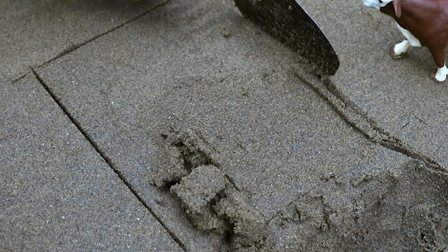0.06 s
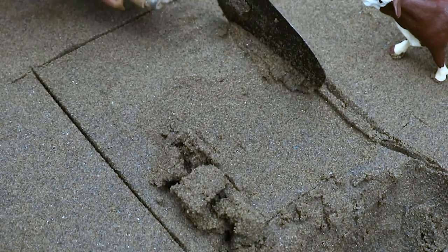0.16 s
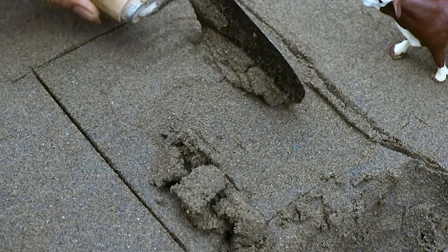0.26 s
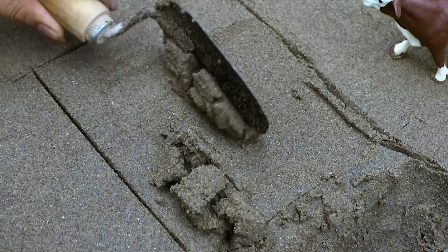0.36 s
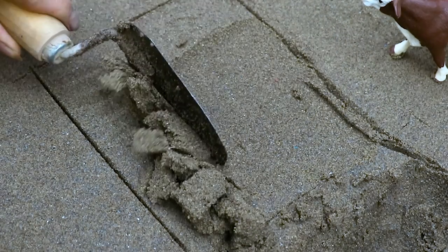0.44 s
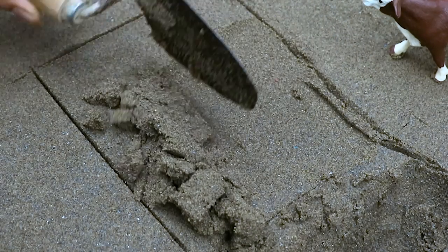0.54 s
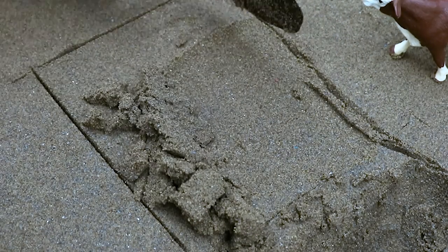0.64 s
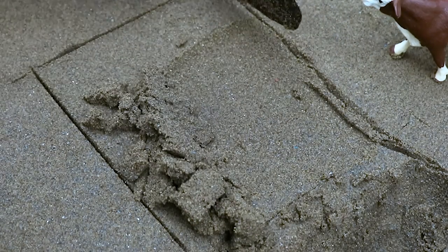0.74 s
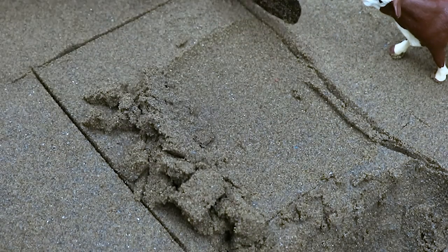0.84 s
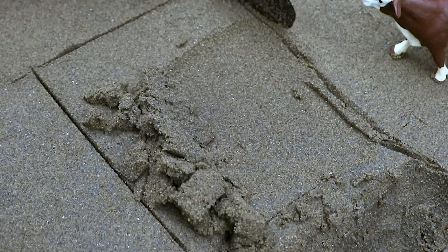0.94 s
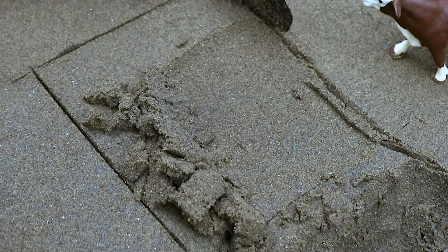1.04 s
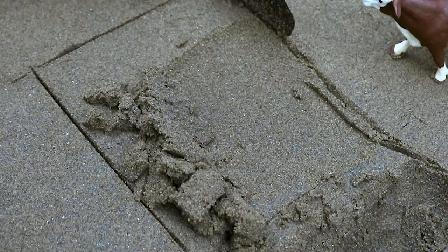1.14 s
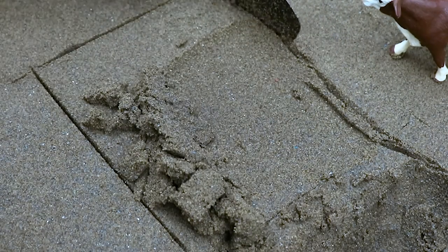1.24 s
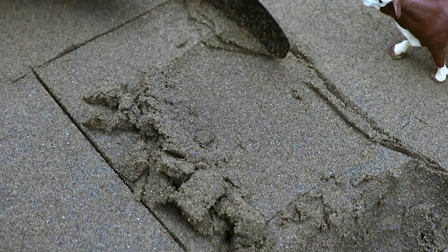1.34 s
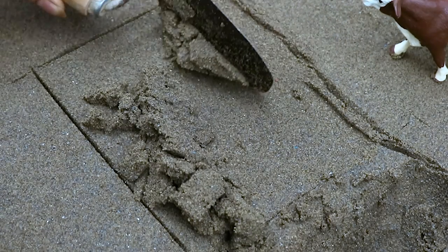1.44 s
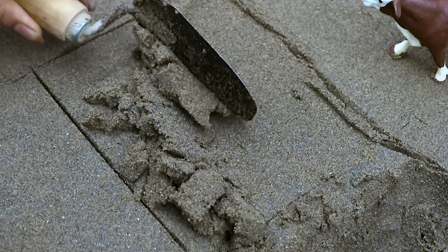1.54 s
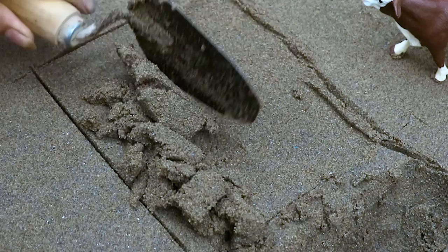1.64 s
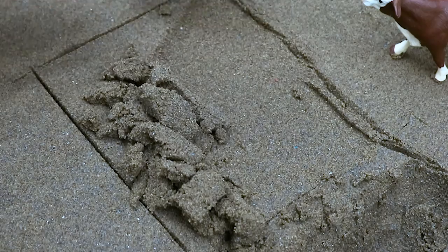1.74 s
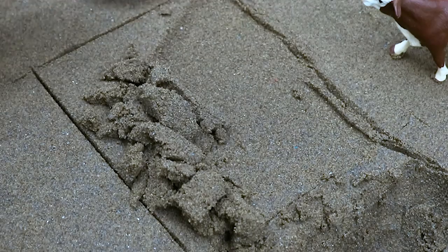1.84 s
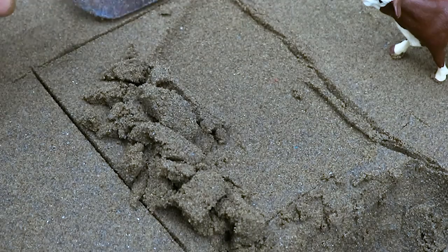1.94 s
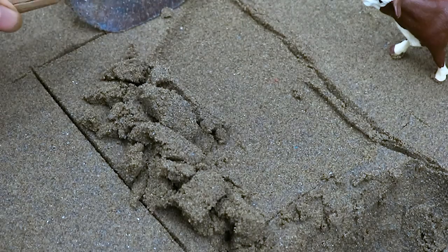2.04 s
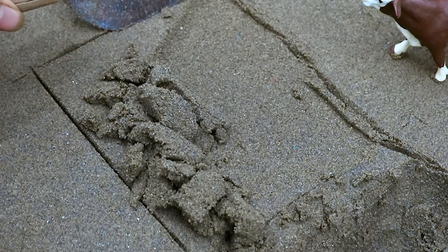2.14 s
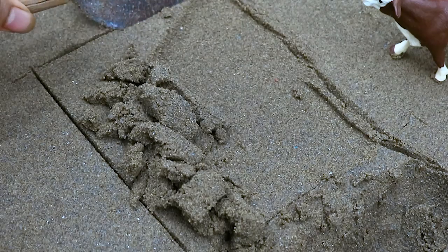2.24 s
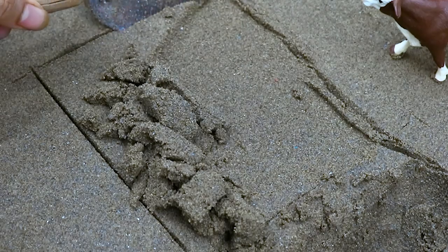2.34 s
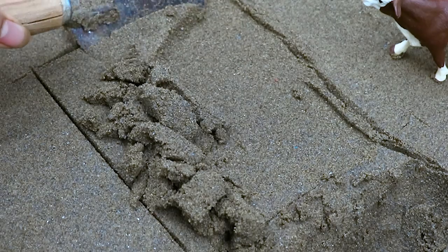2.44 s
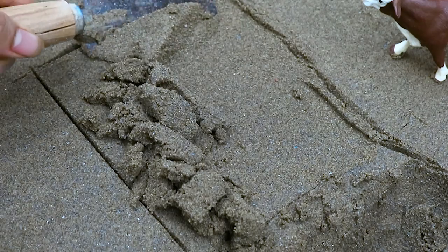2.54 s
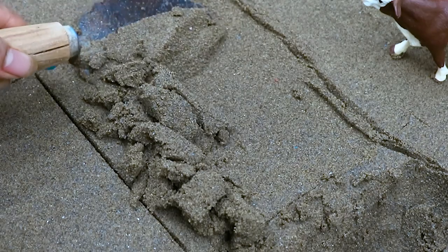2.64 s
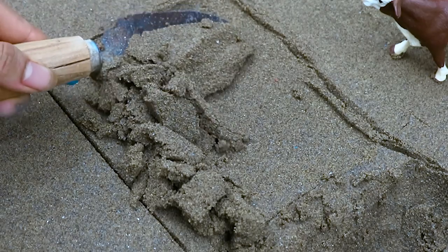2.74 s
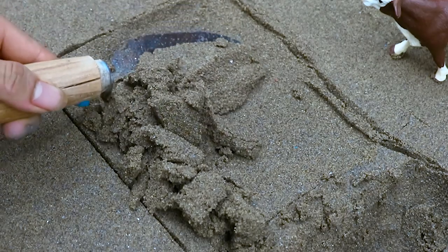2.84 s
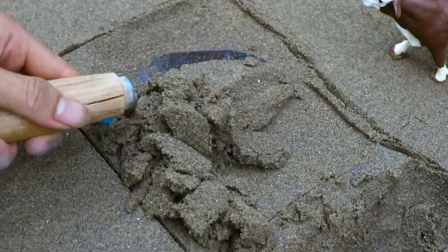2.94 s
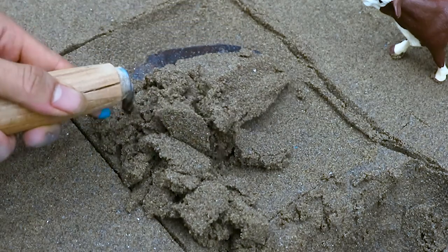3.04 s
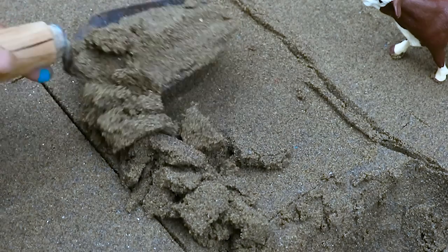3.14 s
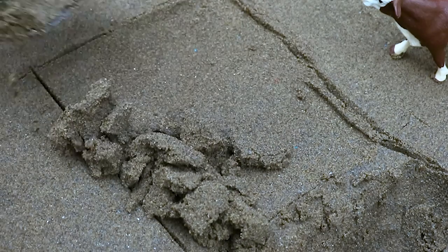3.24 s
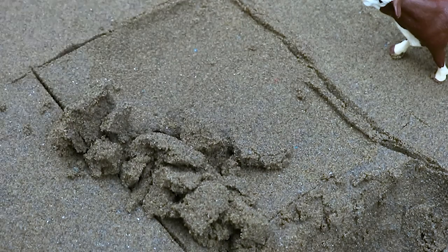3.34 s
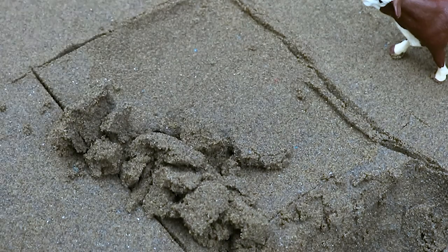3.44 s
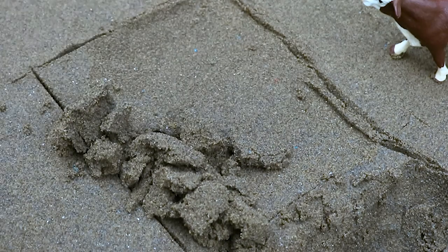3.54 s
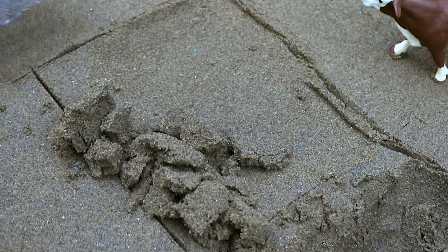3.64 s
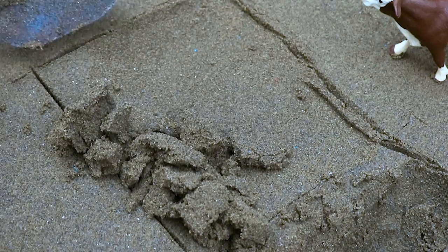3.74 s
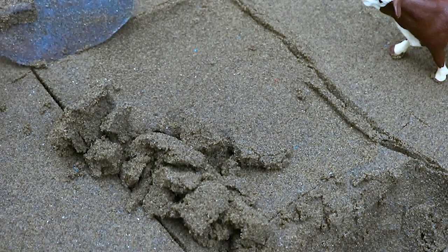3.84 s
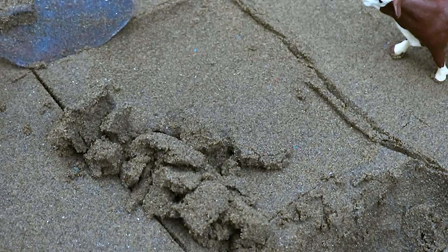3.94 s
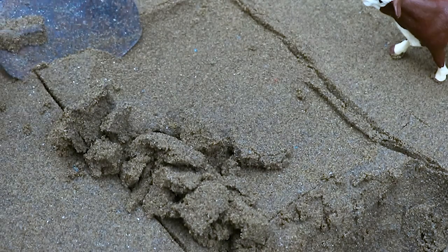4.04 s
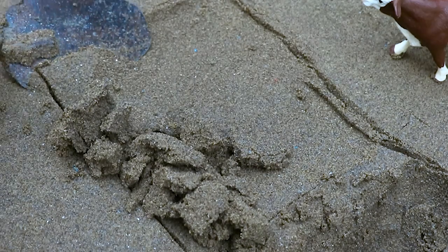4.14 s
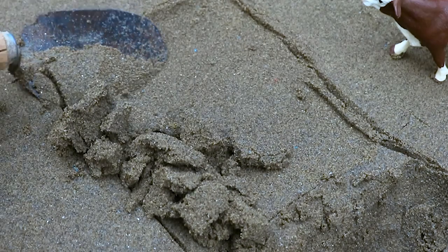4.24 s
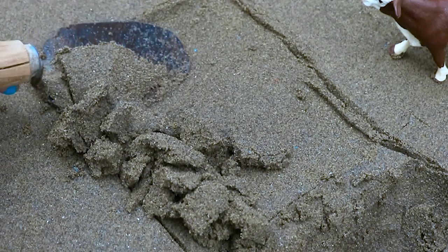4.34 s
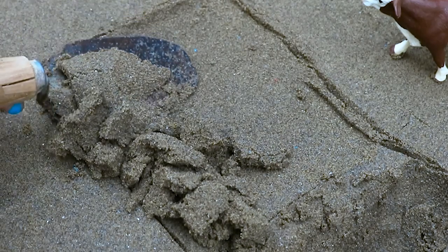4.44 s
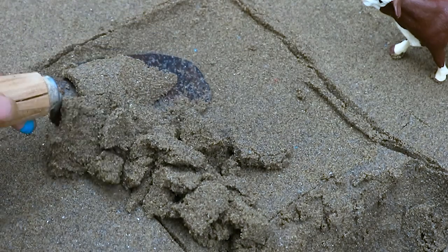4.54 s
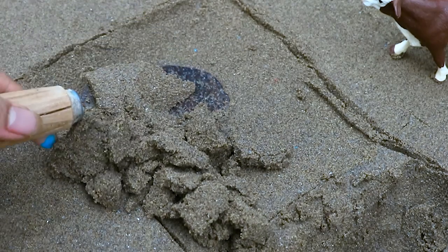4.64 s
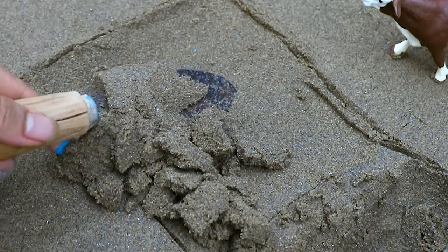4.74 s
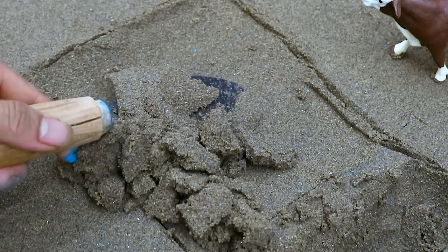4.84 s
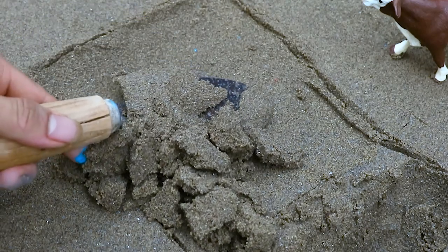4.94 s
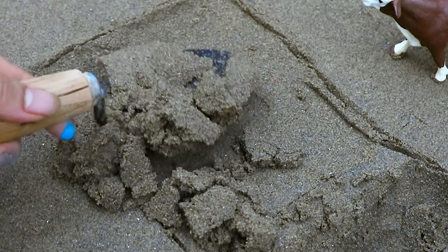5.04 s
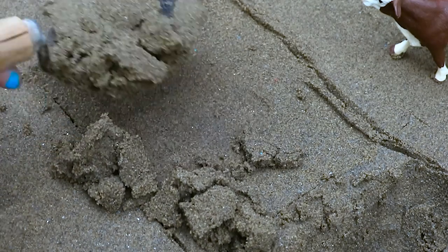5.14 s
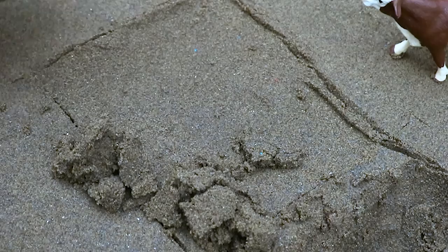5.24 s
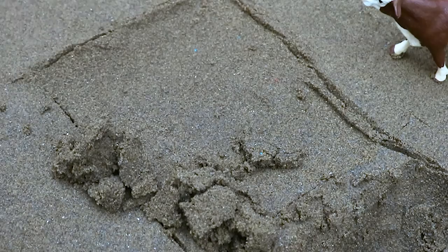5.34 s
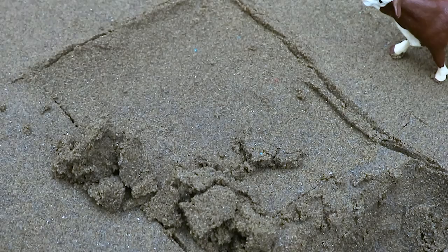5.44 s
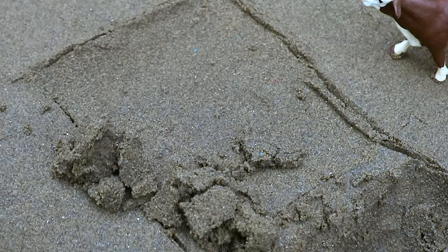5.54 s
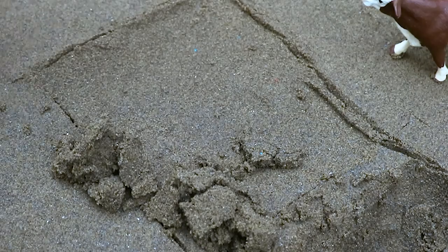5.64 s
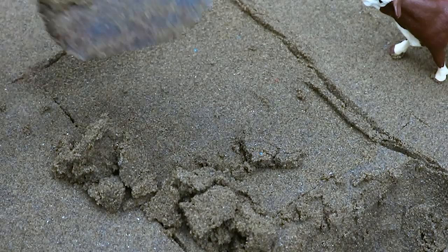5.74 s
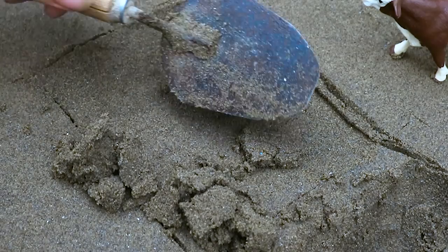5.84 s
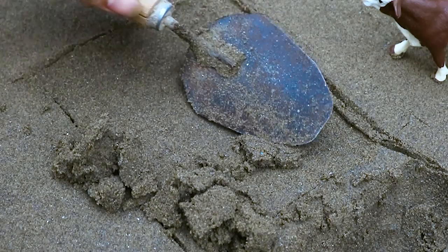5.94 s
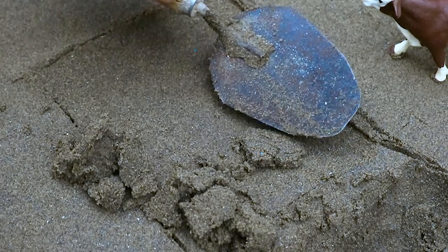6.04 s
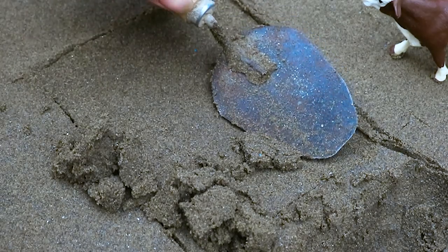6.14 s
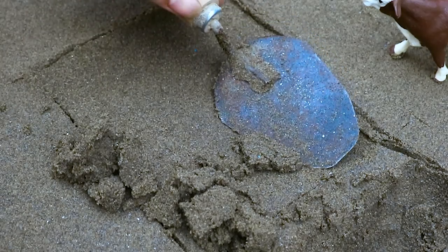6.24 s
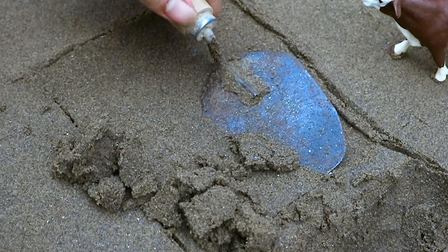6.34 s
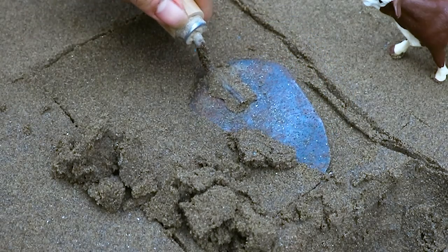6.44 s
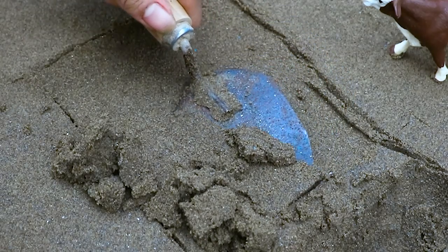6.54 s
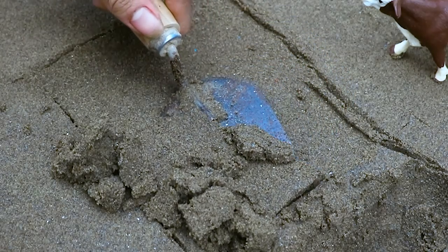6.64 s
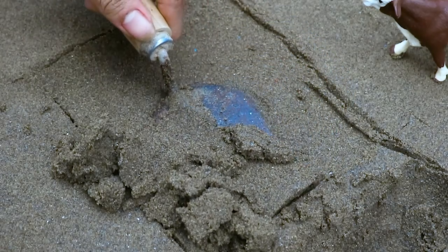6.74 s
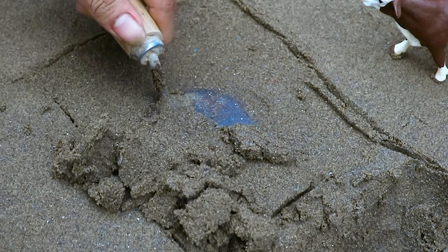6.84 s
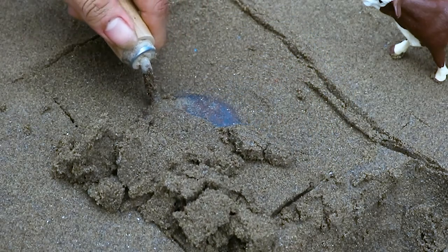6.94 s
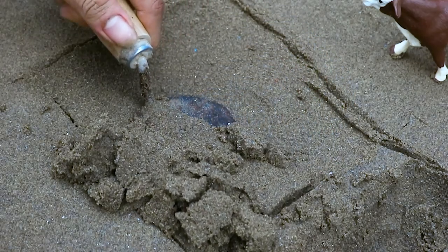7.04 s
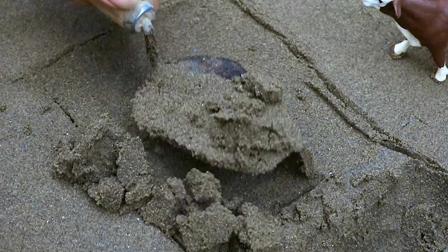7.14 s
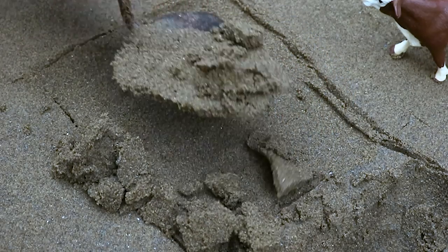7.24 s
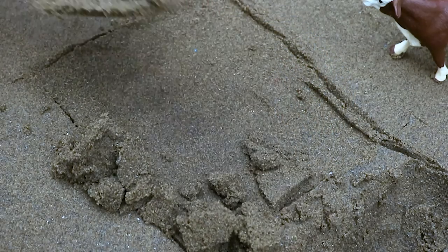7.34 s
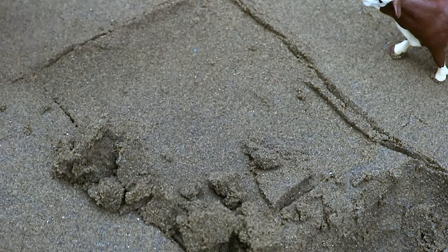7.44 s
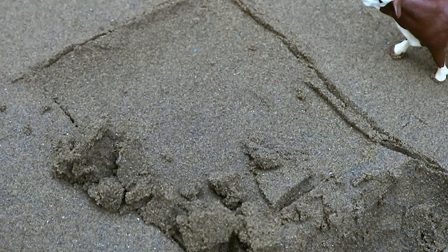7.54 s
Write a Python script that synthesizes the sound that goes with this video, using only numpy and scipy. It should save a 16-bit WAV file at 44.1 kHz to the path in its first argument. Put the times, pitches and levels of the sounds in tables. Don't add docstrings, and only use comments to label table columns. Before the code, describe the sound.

Crisp, grainy scrapes of a metal blade in wet sand come and go close by, with high birdsong echoing among trees.

```python
import sys
import numpy as np
from scipy import signal
from scipy.fft import rfft, irfft, next_fast_len
from scipy.io import wavfile
from scipy.ndimage import uniform_filter1d, map_coordinates

SR = 44100
rng = np.random.default_rng(int(sys.argv[2]) if len(sys.argv) > 2 else 0)


def materialize(psi):
    bounded = np.clip(np.atleast_2d(psi).T, -1, 1)
    quanta = np.round(bounded * 32767).astype(np.int16)
    wavfile.write(sys.argv[1], SR, quanta)


def voltage_ratio(decibels):
    exponent = np.asarray(decibels, float) / 20
    return 10 ** exponent


N = 334278


def white(*shape):
    return rng.standard_normal(shape)


def level(x, db):
    return x * voltage_ratio(db) / np.sqrt(np.mean(x ** 2))


def gain_of(points, hz):
    at_hz, db = np.transpose(points)
    return voltage_ratio(np.interp(np.log(hz + 1), np.log(at_hz), db))


def colour(x, shape):
    size = next_fast_len(x.shape[-1], True)
    hz = np.arange(size // 2 + 1) * SR / size
    return irfft(rfft(x, size) * shape(hz), size)[..., :x.shape[-1]]


def below(hz, edge_hz, order=3):
    return 1 / (1 + (hz / edge_hz) ** (2 * order))


def walk(rate, size):
    hold = int(SR / rate)
    steps = np.repeat(white(size // hold + 1), hold)
    return 1.144 * uniform_filter1d(steps, hold)[:size]


def add(out, x, start_s):
    i = int(start_s * SR)
    out[..., i:i + x.shape[-1]] += x[..., :N - i]


# pitch_hz, density_db (per Hz)
LEAF_HISS = [(25, -28), (90, -35), (160, -16.5), (290, -1), (600, -5), (1000, -10.5), (1900, -12.5),
             (3300, -8), (4500, -12.5), (6000, -17), (9000, -19.5), (12300, -22.5), (13600, -29),
             (14600, -50)]


def wood():
    hiss = colour(white(N), lambda hz: gain_of(LEAF_HISS, hz))
    return level(hiss, -58.5 + 0.39 * walk(0.96, N))


def trees(x, wet_db, t60, near_db, dull_hz):
    t = np.arange(SR) / SR
    trunks = voltage_ratio(0.57 * walk(51.5, len(t)) - 60 * t / t60)
    leaves = voltage_ratio(near_db - 60 * t / 0.05)
    echo = white(len(t)) * (trunks + leaves) * np.clip(t / 0.0038, 0, 1)
    echo = colour(echo, lambda hz: np.sqrt(below(hz, dull_hz)))
    echo = echo * voltage_ratio(wet_db) / np.sqrt(np.sum(echo ** 2))
    return x + signal.fftconvolve(x, echo)[:N]


def note(length_s, start_hz, mid_hz, end_hz, db, round_off=0.49, lean=0.66, wobble=None):
    u = np.linspace(0, 1, int(length_s * 1.15 * SR))
    hz = 2 * start_hz * (u - .5) * (u - 1) - 4 * mid_hz * u * (u - 1) + 2 * end_hz * u * (u - .5)
    if wobble is not None:
        hz = hz * (1 + wobble[:len(hz)])
    shape = np.abs(np.sin(np.pi * u ** lean)) ** round_off
    return voltage_ratio(db + 5) * shape * np.sin(2 * np.pi * np.cumsum(hz) / SR)


def triller():
    syllables, first_s, gap_s, slowing_s = 21, .029, .059, .0004
    peak_s, swell_db_per_s, fade_db_per_s = 0.83, 6, 13.5
    out = np.zeros(N)
    for k, chance in enumerate(white(syllables, 4)):
        s = first_s + gap_s * k + slowing_s * k ** 2
        db = -33 - max(swell_db_per_s * (peak_s - s), fade_db_per_s * (s - peak_s))
        top_hz = (7030 - 360 * s) * (1 + .012 * chance[0])
        sweep_hz = 9610 * (1 + 0.0263 * chance[1])
        hook_db = db + 2.5 + 0.58 * chance[2]
        sweep_db = db - 6 + 4.0 + 0.71 * chance[3]
        hook = note(.018, 0.62 * top_hz, .925 * top_hz, top_hz, hook_db, round_off=1.8, lean=1.45)
        sweep = note(0.015, sweep_hz, 0.84 * sweep_hz, 0.638 * sweep_hz, sweep_db, round_off=0.54, lean=2.25)
        add(out, hook, s - .003)
        add(out, sweep, s + .026 - .001)
    heard = trees(out, -3.5, 0.62, 3.8, 10000)
    breath = colour(white(int(1.5 * SR)),
                    lambda hz: np.sqrt(below(hz, 10300, order=8) - below(hz, 3800, order=8)))
    add(heard, level(breath, -57.5) * np.hanning(len(breath)) ** 0.25, 0)
    return heard


def glides(rows, bend):
    return [(s, length_s, a, a + bend * (b - a), b, db) for s, length_s, a, b, db in rows]


# start_s, length_s, pitch_hz, level_db
LEVEL_WHISTLES = [(.003, 0.022, 8000, -54), (0.474, 0.074, 2305, -63.5), (1.172, .036, 3450, -53),
                  (1.49, .06, 2280, -59), (3.19, 0.051, 3370, -56), (3.353, 0.043, 2340, -44),
                  (3.714, .02, 1940, -61), (4.07, .12, 2296, -53), (4.722, 0.012, 2910, -44),
                  (5.395, 0.039, 4750, -64), (5.712, 0.071, 2397, -48), (5.804, 0.056, 4750, -61.5)]
# start_s, length_s, top_hz, level_db
HANGING_DROPS = [
    (4.559, .03, 3396, -43),
    (5.022, .02, 2498, -46.5),
    (5.048, .016, 2710, -44.8),
    (5.788, .015, 2750, -41.5),
    (5.814, .02, 2795, -43),
]
# start_s, length_s, start_hz, end_hz, level_db
STEEP_PLUNGES = [
    (3.614, .056, 3255, 1600, -42),
]
# start_s, length_s, start_hz, end_hz, level_db
EVEN_RISES = [
    (3.756, 0.02, 4300, 4800, -56),
    (3.775, .014, 2900, 5450, -47),
    (3.838, 0.019, 2270, 2730, -45),
    (4.028, 0.016, 3000, 3700, -54),
    (4.043, .012, 3700, 5400, -43),
    (5.15, .013, 3880, 4500, -51),
    (5.315, 0.0747, 3254, 3476, -35.5),
    (6.858, .03, 4100, 4280, -67),
    (7.297, .016, 3900, 4600, -66),
    (7.5, 0.03, 2690, 3820, -63),
]
# start_s, length_s, start_hz, end_hz, level_db
EVEN_FALLS = [(.03, 0.016, 4480, 3750, -56.5), (.678, 0.027, 4400, 3050, -53), (.896, .02, 4336, 3270, -52),
              (2.76, .075, 5430, 5198, -51), (3.171, 0.011, 3560, 2550, -52),
              (3.29, 0.058, 2000, 1747, -52), (3.451, 0.069, 7100, 5700, -61.5),
              (3.853, .028, 2714, 1890, -50), (4.186, .032, 3640, 2250, -42.5),
              (5.163, .024, 4470, 3250, -43), (5.46, .028, 2490, 1655, -48.5),
              (5.646, 0.022, 6100, 4000, -46.5), (6.935, 0.098, 3580, 2930, -60),
              (7.12, 0.1, 3500, 2850, -60.5), (7.33, 0.075, 3130, 3040, -66.5)]
# start_s, length_s, start_hz, end_hz, level_db
SETTLING_GLIDES = [
    (3.192, 0.019, 2600, 3364, -44),
    (3.455, .059, 9900, 8500, -60.5),
    (4.066, 0.0266, 4180, 3890, -39),
    (4.494, 0.02, 4990, 4340, -44.5),
    (4.917, 0.091, 1982, 2187, -48),
    (5.074, .024, 2774, 2686, -45.5),
    (5.238, .085, 3380, 3222, -42.5),
    (5.518, 0.0288, 3500, 2944, -39),
    (5.845, 0.0295, 2883, 2722, -40),
]
# start_s, level_db
FAR_TURNS = [
    (.522, -52.5),
    (.734, -51),
    (.951, -49),
]


def song():
    half_s, foot_hz, top_hz = .027, 2600, 3540
    ups = [(s, half_s, foot_hz, top_hz, db - 4) for s, db in FAR_TURNS]
    downs = [(s + half_s, 1.15 * half_s, top_hz, foot_hz, db) for s, db in FAR_TURNS]
    notes = [(s, length_s, 0.97 * hz, hz, hz, db) for s, length_s, hz, db in LEVEL_WHISTLES]
    notes += [(s, length_s, hz, 0.97 * hz, 0.805 * hz, db) for s, length_s, hz, db in HANGING_DROPS]
    notes += glides(STEEP_PLUNGES, 0.39) + glides(EVEN_RISES, 0.6) + glides(EVEN_FALLS, .62)
    notes += glides(SETTLING_GLIDES, 1.05)
    return notes + glides(ups, 0.738) + glides(downs, 0.416)


# start_s, length_s, start_hz, end_hz, level_db
ROUGH_GLIDES = [
    (1.88, .176, 5260, 2620, -53),
    (3.455, 0.14, 2600, 2505, -45),
    (2.92, .06, 2200, 2400, -52),
    (1.662, .085, 2850, 3650, -50.5),
    (4.335, .055, 2700, 3600, -45.5),
    (4.735, .05, 3200, 3850, -44.5),
]


def whistlers():
    far_until_s, facing_s, warble_hz = 2.2, 6.8, 76
    far, near = np.zeros((2, N))
    for s, length_s, *pitch_db in song():
        if s < far_until_s:
            add(far, note(length_s, *pitch_db, round_off=0.13, lean=0.61), s - 0.035 * length_s)
        else:
            add(near, note(length_s, *pitch_db) * voltage_ratio(3.5 * (s > facing_s)), s - 0.036 * length_s)
    warble = np.sin(2 * np.pi * warble_hz * np.arange(SR // 2) / SR)
    jitter_hz = (500, 260, 300, 300, 300, 300)
    jitter_depth = (.07, 0.0205, .05, .015, .03, .02)
    for row, rate, depth in zip(glides(ROUGH_GLIDES, 0.69), jitter_hz, jitter_depth):
        s, length_s, *pitch_db = row
        jitter = uniform_filter1d(white(SR // 2), int(SR / rate)) * np.sqrt(SR / rate)
        buzz = note(length_s, *pitch_db, wobble=depth * jitter + 0.049 * warble)
        buzz = buzz * (1 + 0.53 * warble[:len(buzz)])
        add(far if s < far_until_s else near, buzz, s - .04 * length_s)
    return voltage_ratio(-3) * trees(far, 2.4, 0.76, 3.5, 8200) + trees(near, -3.5, 0.74, 8.6, 8300)


def grains(size, per_s, scatter_db):
    when, chance, side = rng.random((int(per_s * size / SR), 3)).T
    strength = voltage_ratio(scatter_db * np.minimum(-np.log(chance + 1e-6), 4)) * np.sign(side - .5)
    return np.bincount((when * size).astype(int), strength, size)


def ports(size, lag_ms, alike):
    shared = grains(size, 12000, 2.6)
    late = map_coordinates(shared, [np.arange(size) - lag_ms * SR / 1000], order=3)
    left = alike * late + np.sqrt(1 - alike ** 2) * grains(size, 12000, 2.6)
    return np.array([left, shared])


# pitch_hz, density_db (per Hz)
SAND_COLOUR = [(90, -28), (160, -12), (350, -2), (900, -9.5), (1500, -7), (2400, -8.5), (4400, 2),
               (6000, 1), (8000, 0), (10500, 0), (15500, 1)]
# pitch_hz, width_hz, gain_db
STEEL_MODES = [
    (2370, 590, 6),
    (3440, 730, 3),
    (7000, 820, 2),
    (9700, 1600, 5),
    (353, 42, 4.5),
    (4345, 145, -11.5),
    (7650, 290, -7),
    (11960, 180, -5),
]


def blade(hz):
    modes_db = sum(db / (1 + (2 * (hz - f) / width) ** 2) for f, width, db in STEEL_MODES)
    return gain_of(SAND_COLOUR, hz) * voltage_ratio(modes_db)


LAYER_BORDERS = [680, 1750, 2900, 8000]


def patchy_layers(x, layers_db, patchy_db, rate):
    size = next_fast_len(x.shape[-1], True)
    hz = np.arange(size // 2 + 1) * SR / size
    spectrum = rfft(x, size) * blade(hz)
    borders = [60.] + LAYER_BORDERS + [16500.]
    out = 0
    for lo, hi, db, count in zip(borders, borders[1:], layers_db, (2, 2, 2, 5, 5)):
        edges = np.geomspace(lo, hi, count + 1)
        layer = 0
        for a, b in zip(edges, edges[1:]):
            band = irfft(spectrum * np.sqrt(below(hz, b, order=8) - below(hz, a, order=8)), size)
            layer = layer + band[:, :len(db)] * voltage_ratio(patchy_db * walk(rate, len(db)))
        out = out + level(layer, db)
    return out


# pitch_hz, gain_db
PORT_DIFFERENCE = [(100, 1.5), (700, -6), (1500, -7), (2500, -2), (7000, -5), (8800, -10), (10500, -1),
                   (15000, 2.5)]


def narrow(x):
    side = colour((x[0] - x[1]) / 2, lambda hz: gain_of(PORT_DIFFERENCE, hz))
    return x.mean(axis=0) + side * np.array([[1], [-1]])


def hand(rows, rasp_db, thud_db):
    return [(s, grit, rasp_db + 0.26 * load, load, thud_db + 1.26 * load) for s, grit, load in rows]


# pitch_hz, density_db (per Hz)
AIR_RUMBLE = [(20, -8.5), (50, 1.5), (100, -0.5), (250, -13), (1000, -14), (5000, -22), (16000, -21.5)]


def stroke(curve, start, stop, lag):
    size = int((stop - start) * SR)
    t = start + np.arange(size) / SR
    s, *columns = np.transpose(curve)
    grit, rasp, crunch, thud = (np.interp(t, s, c) for c in columns)
    grit = np.where(t < s[0], grit - 30, grit)
    grit = grit + 1.23 * walk(40.5, size)
    lag_ms = np.interp(t, *np.transpose(lag)) + 0.019 * walk(11.39, size)
    layers_db = [grit + thud + 1.13, grit + crunch + 1.94, grit + (crunch + rasp) / 2 + 2.32,
                 grit + rasp + 5.23, grit + 5]
    sand = patchy_layers(ports(size, lag_ms, .78), layers_db, patchy_db=3.0, rate=16.04)
    common, apart = colour(white(2, size), lambda hz: gain_of(AIR_RUMBLE, hz))
    air = level(common + 0.24 * apart * np.array([[1], [-1]]), -58.5)
    fade = np.clip(np.minimum((t - start) / 0.0054, (stop - t) / 0.028), 0, 1)
    return (narrow(sand) * voltage_ratio([[-.9], [.9]]) + air) * fade


def starved(x):
    out = x.copy()
    for at, pitch, length in rng.random((int(26 * x.shape[1] / SR), 3)):
        size = int(np.interp(length, (0, 1), (.04, .12)) * SR)
        i = int(at * (x.shape[1] - size))
        centre_hz = 3800 * (13000 / 3800) ** pitch
        band = colour(out[:, i:i + size], lambda hz: below(np.abs(hz - centre_hz), 140, order=6))
        out[:, i:i + size] -= band * signal.windows.tukey(size, .3)
    return out


def tick(db, body_db):
    burst = white(2, 600) * np.exp(-np.arange(600) / (0.0042 * SR))
    body = voltage_ratio(body_db - 2) - 1
    return voltage_ratio(db - 8.0) * colour(burst, lambda hz: (1 - below(hz, 1300)) * (1 + body * below(hz, 5300)))


# start_s, stop_s
STROKE_TIMES = [
    (.115, .65),
    (6.29, 7.53),
    (4.04, 5.02),
]
# time_s, left_lag_ms
PORT_LAGS = [
    [(.12, 0.085), (.65, 0.093)],
    [(6.3, 0.1), (7.5, 0.04)],
    [(4.05, 0.087), (5, 0.063)],
]
# time_s, grit_db (pressure), load_db (sand on the blade)
SKIM_HAND = [
    (.135, -57, -8),
    (.141, -46, -4),
    (.211, -43, -2),
    (.247, -52, 0),
    (.467, -53.5, 0),
    (.517, -61, -10),
    (.533, -56, -9.5),
    (.587, -69, -1),
    (.65, -69, 2),
]
DIG_IN_HAND = [
    (6.309, -46.5, -3),
    (6.343, -53.5, 0),
    (6.377, -50.5, 0),
    (6.397, -51.5, 1),
    (6.489, -42, -3),
    (6.531, -45, -0.5),
    (6.569, -60, 6.5),
]
DIG_ON_HAND = [
    (6.61, -57, 6.5),
    (6.686, -50, -0.5),
    (6.762, -54, 2),
    (6.846, -56.5, 2),
    (6.874, -61.5, 2),
    (6.898, -57.5, -1.5),
    (7.0, -57.5, -8),
]
DIG_OUT_HAND = [
    (7.02, -67.5, -2),
    (7.076, -52, 1),
    (7.116, -58, 8),
    (7.146, -60, 0.5),
    (7.214, -51.5, -29),
    (7.276, -65.5, -20),
    (7.33, -59, -35),
    (7.442, -71, -40),
    (7.51, -64, -26),
]
SHOVE_IN_HAND = [
    (4.062, -47, -9),
    (4.082, -58.5, 0),
    (4.102, -50.5, -5.5),
    (4.14, -56, -1),
    (4.208, -45.5, -3),
    (4.294, -43.5, 0),
    (4.344, -57.5, 12),
    (4.372, -60.5, 5),
    (4.49, -52.5, -6),
]
SHOVE_ON_HAND = [
    (4.52, -60.5, -3),
    (4.554, -49, -1),
    (4.618, -50.5, 8),
    (4.66, -75, 15.5),
    (4.69, -62, 0.5),
    (4.824, -57, -1.5),
    (4.866, -57.5, 6),
    (4.968, -84, 15),
    (4.998, -70, 1),
]
# start_s, peak_db, body_db (re peak)
EDGE_TICKS = [
    (0.1344, -40, -10.5),
    (2.28, -25, -17),
    (3.2877, -27.5, -1),
    (3.3394, -41, -3),
    (4.0609, -30, 13),
    (4.8868, -38, -13),
]


def trowel():
    skim_again_s, dig_again_s = 1.022, -4.031
    out = np.zeros((2, N))
    skim = hand(SKIM_HAND, rasp_db=8.5, thud_db=-4.5)
    dig = hand(DIG_IN_HAND, rasp_db=7.5, thud_db=-3)
    dig += hand(DIG_ON_HAND, rasp_db=8.0, thud_db=-4.0)
    dig += hand(DIG_OUT_HAND, rasp_db=7.5, thud_db=-16)
    shove = hand(SHOVE_IN_HAND, rasp_db=7.5, thud_db=-3) + hand(SHOVE_ON_HAND, rasp_db=8.0, thud_db=0.5)
    repeats = (skim_again_s, dig_again_s, None)
    for curve, (start, stop), lag, again in zip((skim, dig, shove), STROKE_TIMES, PORT_LAGS, repeats):
        sound = starved(stroke(curve, start, stop, lag))
        add(out, sound, start)
        if again:
            add(out, sound, start + again)
    for s, db, body_db in EDGE_TICKS:
        sound = tick(db, body_db)
        add(out, sound, s)
        if s < STROKE_TIMES[0][1] or 2 < s < 4:
            add(out, sound, s + (skim_again_s if s < 1 else -dig_again_s))
    return out


def scene():
    return wood() + triller() + whistlers() + trowel()


def band_limit(x):
    return signal.sosfilt(signal.butter(12, 16400, fs=SR, output="sos"), x)


def record(dry):
    top = signal.ellip(10, .2, 70, 15830, fs=SR, output="sos")
    return band_limit(signal.sosfilt(top, dry))


dry = scene()
out = record(dry)
materialize(out)
```